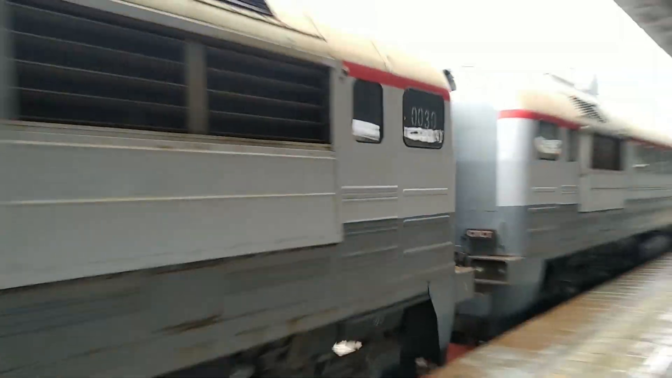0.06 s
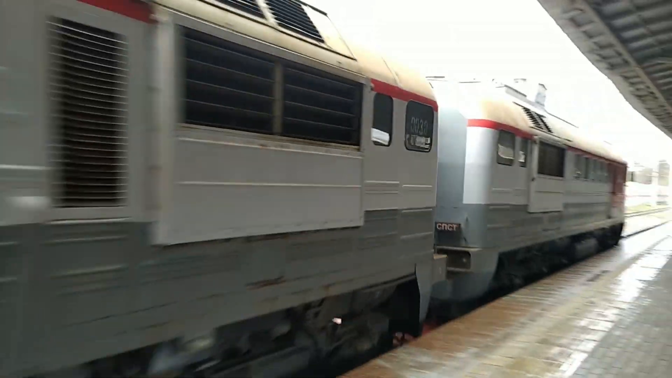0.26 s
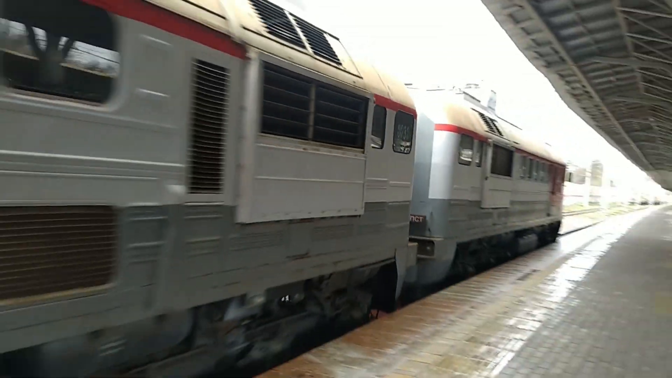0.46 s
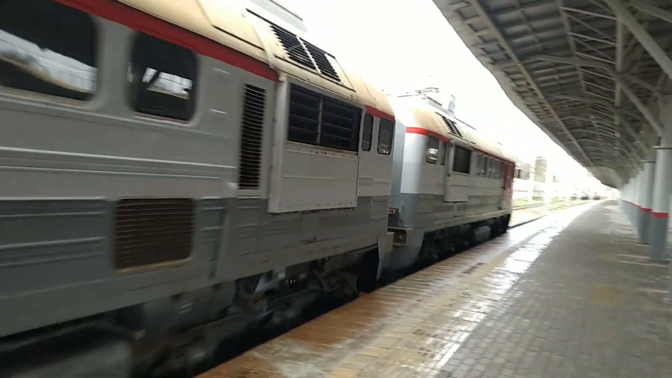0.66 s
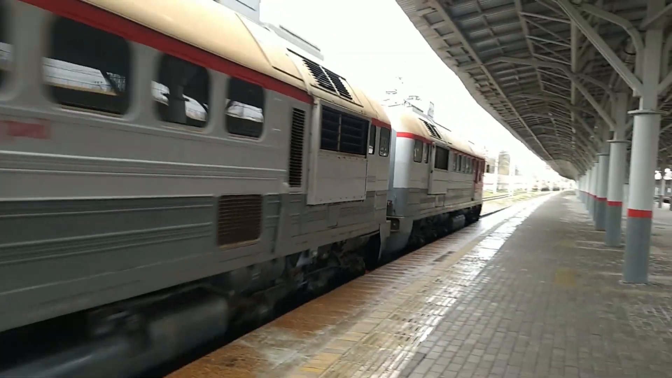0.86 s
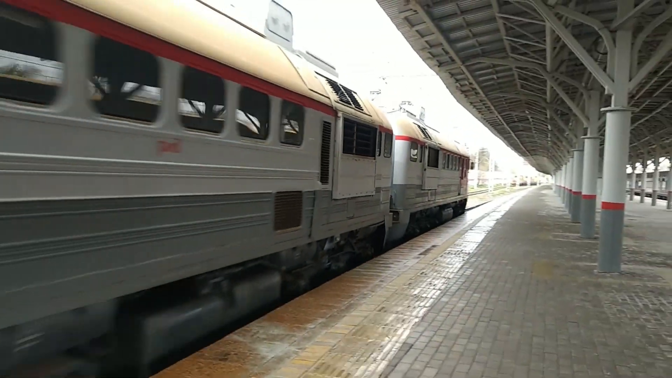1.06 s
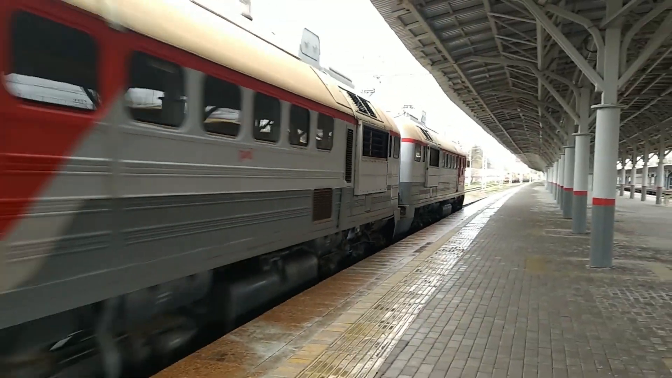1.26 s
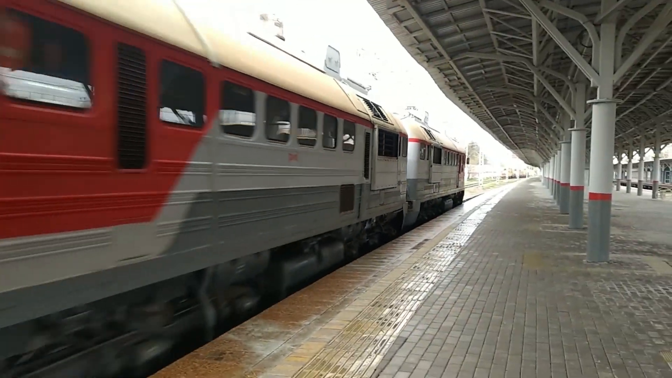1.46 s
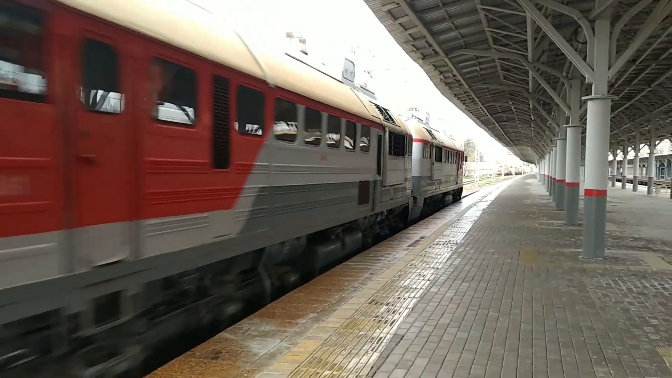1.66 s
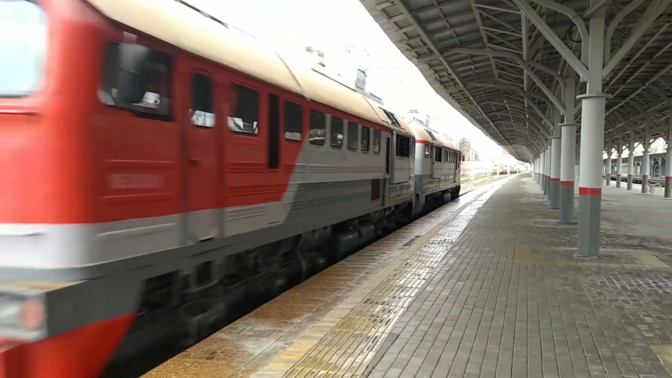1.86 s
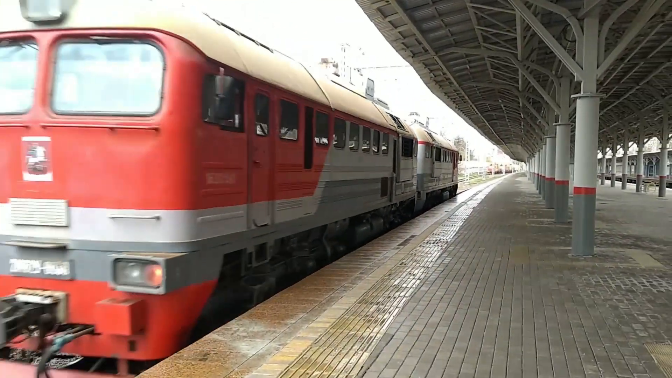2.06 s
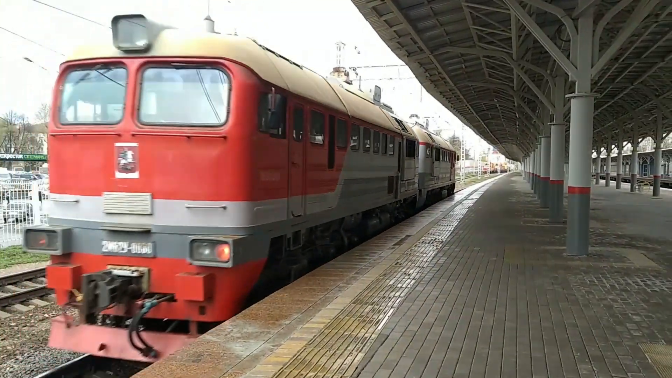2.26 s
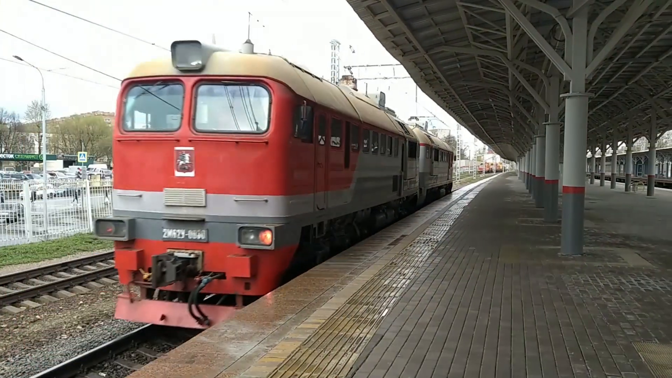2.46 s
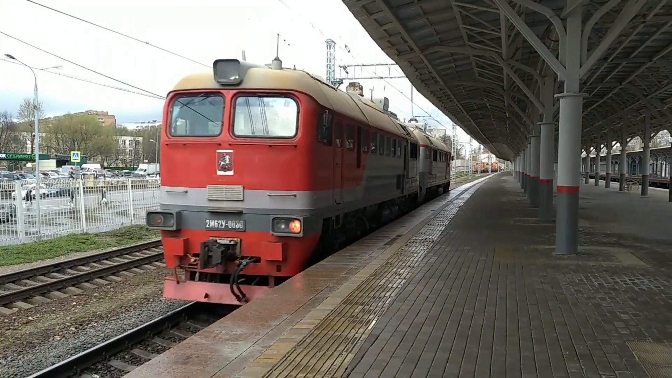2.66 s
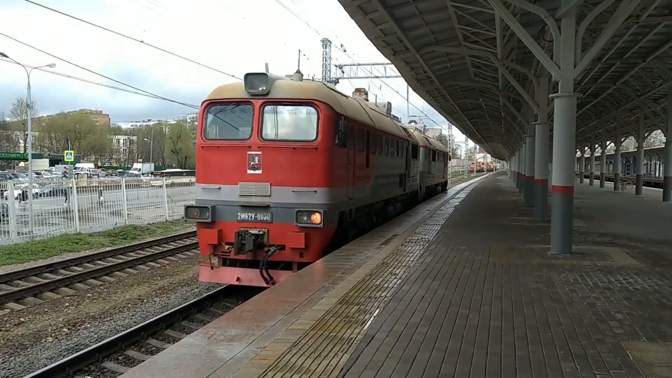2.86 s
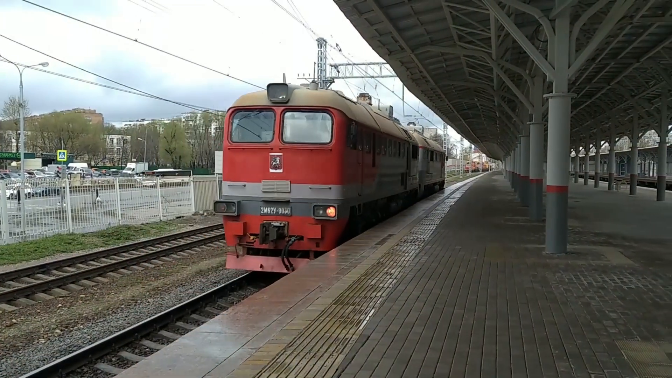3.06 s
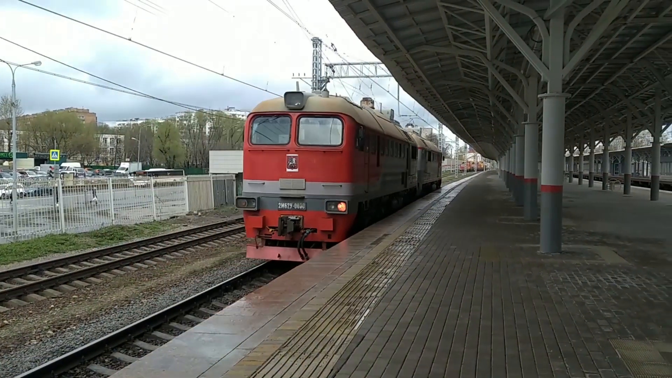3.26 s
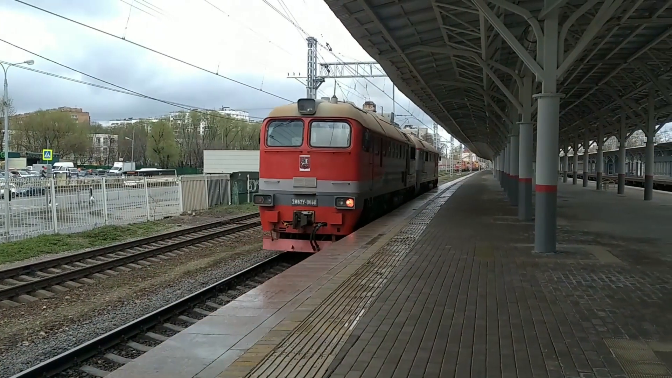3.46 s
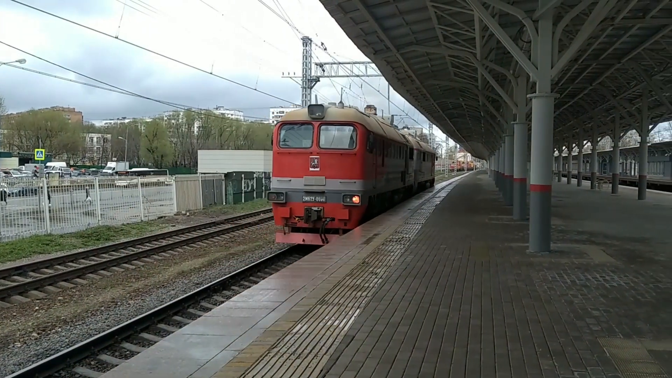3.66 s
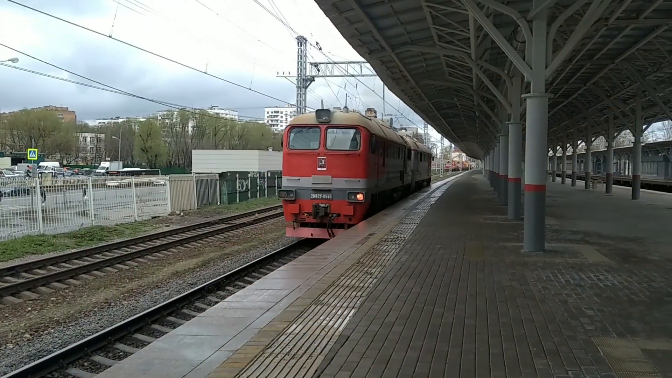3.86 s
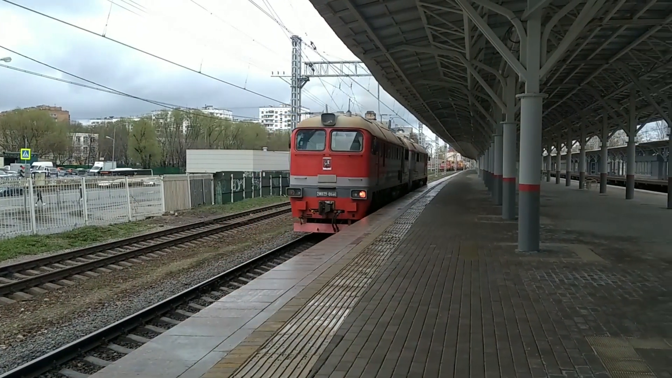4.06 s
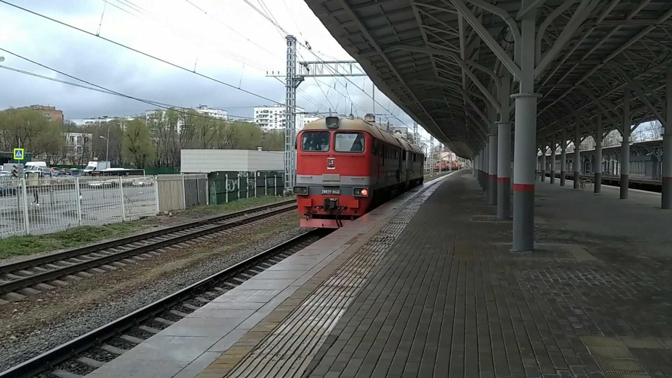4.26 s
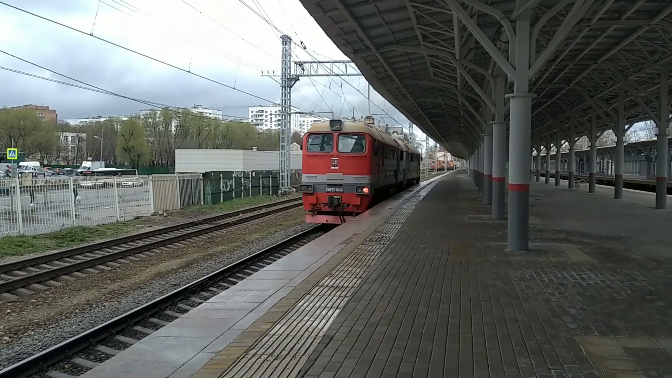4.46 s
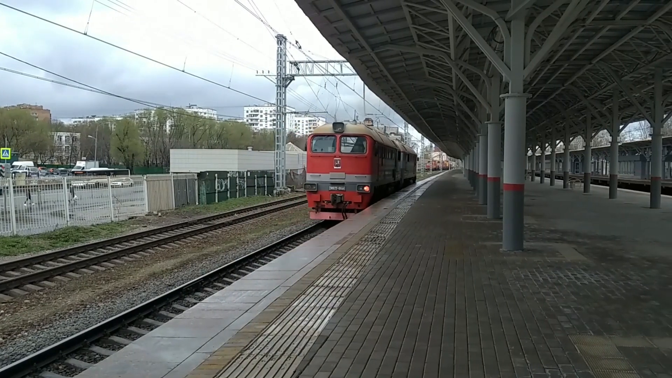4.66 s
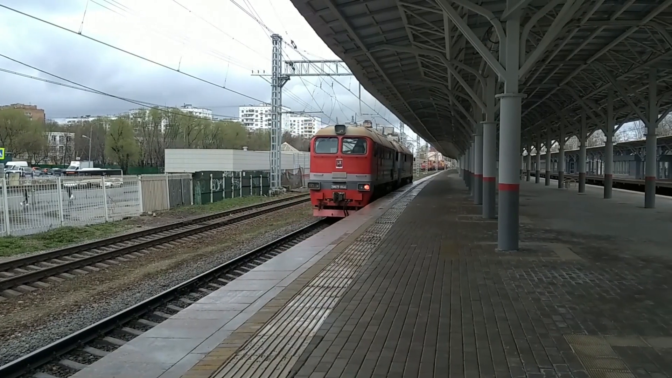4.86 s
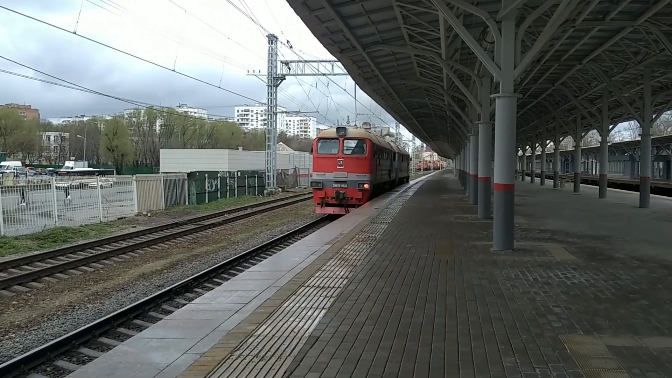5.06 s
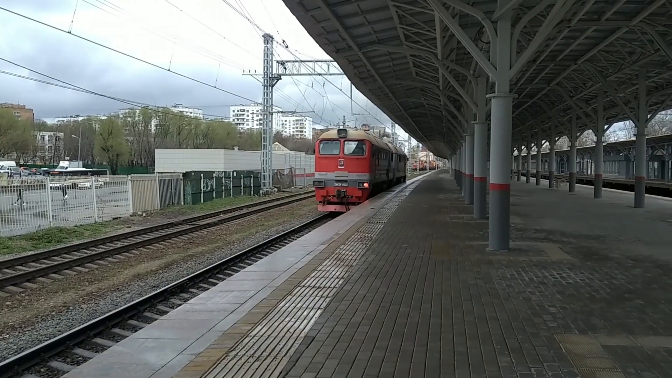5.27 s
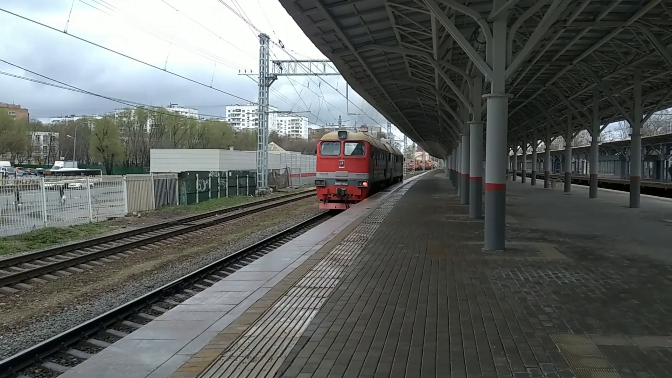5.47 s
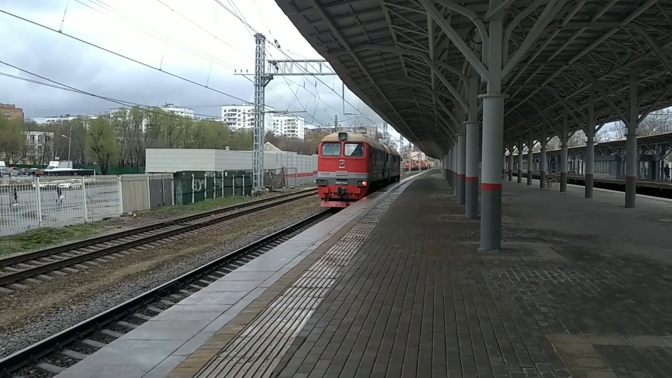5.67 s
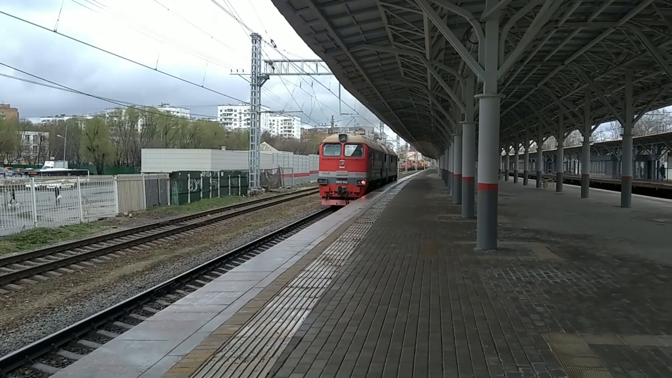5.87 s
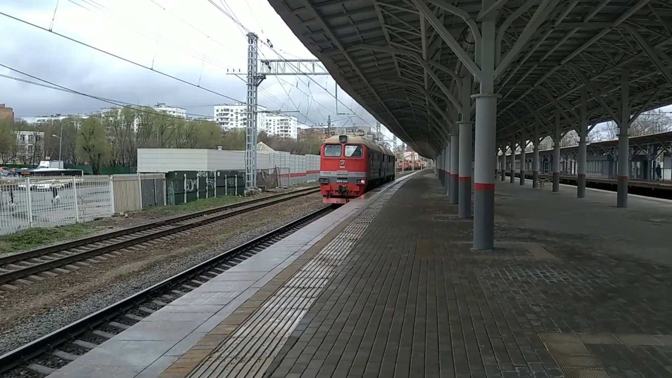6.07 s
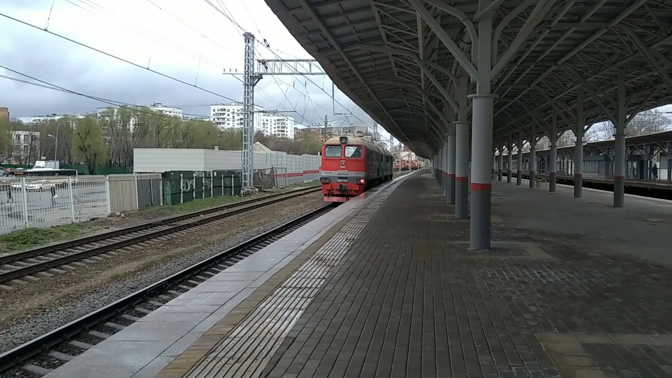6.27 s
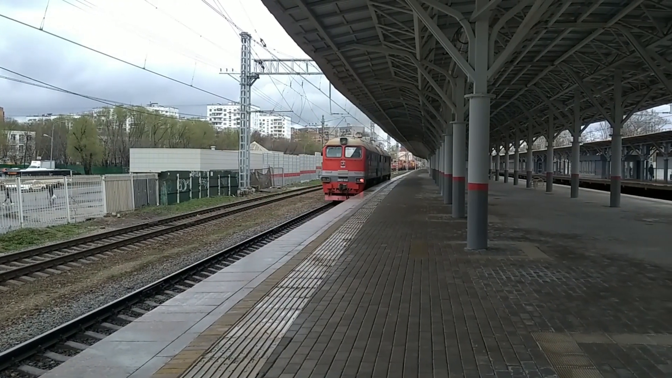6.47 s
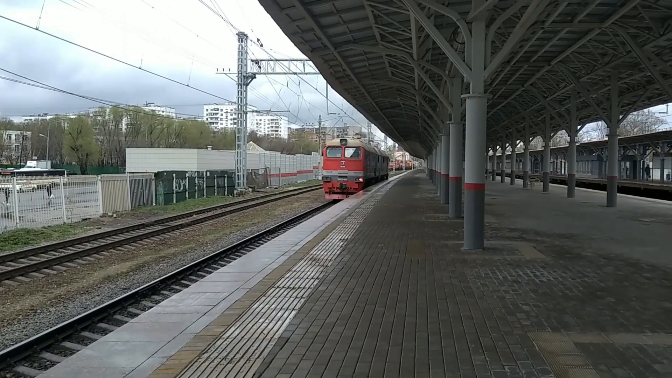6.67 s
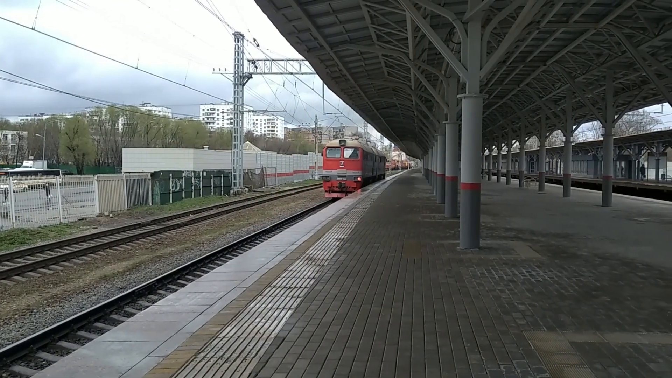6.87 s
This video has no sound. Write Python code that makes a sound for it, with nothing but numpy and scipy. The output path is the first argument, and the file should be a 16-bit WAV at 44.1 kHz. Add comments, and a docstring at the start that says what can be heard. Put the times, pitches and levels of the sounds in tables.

```python
"""Two-stroke engines of a two-unit diesel locomotive drone along a station platform and draw away.
Engine: tones locked to the crank over noise pulsed at the firing rate, plus a gear whine and a howl.
Wheels: shaped noise roars and grinds; machinery: bright noise chatters, hisses and rattles.
Two dull thumps, late, are decaying sines with noise; a low town rumble lies below.
The microphone ports are a little apart; the right one is far brighter."""
import sys
import numpy as np
from scipy import signal
from scipy.fft import rfft, irfft, next_fast_len
from scipy.io import wavfile
from scipy.ndimage import uniform_filter1d, map_coordinates

SR = 44100
rng = np.random.default_rng(int(sys.argv[2]) if len(sys.argv) > 2 else 0)


def inscribe(sig):
    """Save sig as 16-bit PCM at rate SR to the path in sys.argv[1].

    A 1-D sig is mono; a 2-D sig holds one channel per row.
    Samples are clipped to [-1, 1] before scaling.
    """
    pcm = np.round(np.clip(np.atleast_2d(sig).T, -1, 1) * 32767)
    wavfile.write(sys.argv[1], SR, pcm.astype(np.int16))


N = 305436


def amp(db):
    """Decibels to gain."""
    return 10 ** (np.asarray(db) / 20)


def unit(x):
    """Scaled to rms 1."""
    return x / np.sqrt(np.mean(x ** 2) + 1e-20)


def along(points, hz):
    """(frequency [Hz], value) points interpolated on a log frequency axis."""
    f, v = np.transpose(points)
    return np.interp(np.log(hz + 1), np.log(f + 1), v)


def curves(rows):
    """One value per sample for each column after the time [s]."""
    s, *cols = np.transpose(rows)
    return [np.interp(np.arange(N) / SR, s, c) for c in cols]


def wobble(knots_per_s):
    """Smooth random curve through normally distributed knots."""
    knots = rng.standard_normal(int(N * knots_per_s / SR) + 4)
    return map_coordinates(knots, [np.arange(N) * knots_per_s / SR])


def filtered(x, response):
    """x times a complex response of frequency."""
    size = next_fast_len(N + SR // 2)
    return irfft(rfft(x, size) * response(np.fft.rfftfreq(size, 1 / SR)), size)[..., :N]


def pan(left_right_db):
    """Left and right gains with a mean of 1."""
    gains = amp(np.array([[.5], [-.5]]) * left_right_db)
    return gains / gains.mean(0)


# phase by which the left port leads: (frequency [Hz], phase [rad])
LEFT_LEAD_RAD = [(90, 0.33), (170, 0.31), (260, 0.72), (400, 0.64), (660, -0.66), (1000, 0.55),
                 (1300, 0.32), (1600, 1.39), (1950, 1.5), (2400, 2), (3300, 4)]


def ports(x):
    """Sound from the track reaches the two ports out of step."""
    half_turns = np.array([[.5j], [-.5j]])
    return filtered(x, lambda hz: np.exp(half_turns * along(LEFT_LEAD_RAD, hz)))


# likeness of the two ports: (frequency [Hz], coherence [0-1])
PORT_COHERENCE = [(60, 1), (170, 0.76), (320, 0.99), (480, 0.84), (750, 0.97), (1050, 0.85), (1400, 0.76),
                  (1700, 0.99), (2000, 0.62), (2500, 0.75), (2900, 0.47), (3400, 1), (3900, 0.11)]


def rush(spectrum, patchy_db):
    """Shaped stereo noise of rms 1, with random gain patches in time and frequency."""
    z = signal.stft(rng.standard_normal((2, N)), nperseg=1024)[2]
    field = uniform_filter1d(rng.standard_normal(z.shape[1:]), size=5, axis=0)
    field = uniform_filter1d(field, size=7, axis=1)
    pair = signal.istft(z * amp(patchy_db * unit(field)), nperseg=1024)[1][:, :N]

    def mix(hz):
        turn = np.arccos(np.clip(along(PORT_COHERENCE, hz), 0, 1)) / 2
        return amp(along(spectrum, hz)) * [np.cos(turn), np.sin(turn)]

    mid, side = filtered(pair, mix)
    return unit(ports(np.array([mid + side, mid - side])))


def bursts(times_s, sizes, life_s):
    """Short swells at the given times; envelope around 0 with spread 1."""
    blows = np.bincount(np.abs(times_s * SR).astype(int), sizes, minlength=N)[:N]
    t = np.arange(SR // 10) / SR
    envelope = signal.fftconvolve(blows, t ** 2 * np.exp(-t / life_s))[:N]
    return unit(envelope - envelope.mean())


GRIT_PER_S, GRIT_LIFE_S, GRIT_DEPTH = 70, .0006, .3


def grit():
    """Gain of random ticks of uneven size in the running gear."""
    when, size = rng.random((round(GRIT_PER_S * N / SR), 2)).T
    return 1 + GRIT_DEPTH * bursts(when * N / SR, size ** 2, GRIT_LIFE_S)


SPEED_M_PER_S = 12.91
LENGTH_M = 20.9  # length over which the sound is spread
# shared swell, scaled by each source's swell share: (time [s], level [dB])
SWELL_DB = [(0.01, -0.7), (0.8, 0.9), (1.76, 1), (2.04, -1), (2.42, -1.5), (2.5, -0.7), (3.01, 2.5),
            (3.19, -1), (3.4, 1), (3.57, -1.5), (4.07, -2), (4.24, 1.1), (4.51, 0), (4.7, -1.5), (5.37, -3),
            (6.09, 1), (6.53, -0.4), (6.93, 0.5)]


def receding(leaves_s, shield_db_per_m, swells):
    """Level [dB] of a source drawing away: spreading, platform-edge shielding, shared swell."""
    gone_m = SPEED_M_PER_S * np.maximum(np.arange(N) / SR - leaves_s, 0)
    distance_m = np.hypot(LENGTH_M, gone_m)
    spreading_db = -20 * np.log10(distance_m / LENGTH_M)
    shielding_db = -shield_db_per_m * (distance_m - LENGTH_M)
    return spreading_db + shielding_db + swells * curves(SWELL_DB)[0]


# locomotive's side, scaled and offset by each source: (time [s], left-right balance [dB])
BEARING_DB = [(0.1, 2), (0.21, 4.5), (0.36, 3), (0.75, 4), (2.04, 0.5), (4.5, 0), (4.8, 2), (6.18, 3),
              (6.8, 3)]


def bearing():
    """Left-right balance [dB] of the locomotive, per sample."""
    return curves(BEARING_DB)[0]


# relative spectrum: (frequency [Hz], density [dB])
STATION_SPECTRUM = [(20, -40), (42, -23), (58, -8), (78, 1), (115, -5.5), (170, 0), (300, -9), (1000, -18),
                    (4000, -45), (9000, -70)]


def station():
    """Town around the platform: steady low rumble of shaped noise."""
    return amp(-57.0) * rush(STATION_SPECTRUM, patchy_db=1.5)


# knock components: (time [s], level before attack [dB], pitch [Hz], 60 dB decay [s])
THUMPS_HIT = [(5.176, -32.5, 790, .07), (5.178, -23.5, 347, .045), (5.185, -35, 110, 0.12),
              (6.786, -36, 120, .08)]


def thumps():
    """Dull knocks: decaying sines, each with a puff of noise around its pitch."""
    out = np.zeros(N + SR)
    t = np.arange(SR // 4) / SR
    for s, db, hz, t60_s in THUMPS_HIT:
        band = signal.butter(2, [hz / 2, hz * 2.0], "band", fs=SR, output="sos")
        puff = unit(signal.sosfilt(band, rng.standard_normal(len(t))))
        envelope = amp(db - 60 * t / t60_s) * (1 - np.exp(-t / 0.0018))
        knock = np.sin(2 * np.pi * hz * t) + 0.4 * puff
        out[round(s * SR):][:len(t)] += envelope * knock
    return ports(out[:N])


CHATTER_HZ, CHATTER_START_S, CHATTER_LEAD_S = 23.1, 0.0052, 0.0145
CHATTER_SCATTER_PERIODS, CHATTER_SPREAD_DB = .03, 1.5


def chatter(life_s):
    """Fast, regular train of double blows, alike in mean level."""
    count = 200
    beat, size, lead_size = rng.standard_normal((count, 3)).T
    at_s = CHATTER_START_S + (np.arange(count) + CHATTER_SCATTER_PERIODS * beat) / CHATTER_HZ
    times_s = np.r_[at_s, at_s - CHATTER_LEAD_S]
    return bursts(times_s, amp(CHATTER_SPREAD_DB * np.r_[size, lead_size]), life_s)


# metal rattles, levels before attack:
# (time [s], hiss level [dB], lower clatter level [dB], 60 dB decay [s])
RATTLES_HIT = [(1.735, -42, -37, .16), (2.298, -44, -35, .04), (2.34, -37, -55, .04),
               (2.474, -25.5, -46, .055), (2.636, -36, -55, .04), (3.002, -39, -35, .06),
               (3.327, -37, -52, .06), (3.382, -35.5, -55, .07), (3.425, -37, -55, .045),
               (3.64, -32.5, -50, .07), (3.848, -36, -53, .07), (4.257, -38, -55, .05),
               (4.364, -39, -55, .05), (5.484, -45, -62, .057), (6.753, -48, -64, .091)]


def rattles():
    """Decaying envelopes of the louder rattles: in the hiss, and in the lower clatter."""
    out = np.zeros((2, N))
    for s, hiss_db, clatter_db, t60_s in RATTLES_HIT:
        age = np.maximum(np.arange(N) / SR - s, 0)
        decay = amp(-60 * age / t60_s) * (1 - np.exp(-age / 0.0012))
        out += amp([[hiss_db], [clatter_db]]) * decay
    return out


HISS_DB, HISS_LEAVES_S = -32.5, 2.32
HISS_SHIELD_DB_PER_M = 0.2775  # treble is lost sooner
CLATTER_BESIDE_HISS_DB = -13.5
# relative depth of chatter and of its slow wobble: (time [s], depth [0-1])
CHATTER_DEPTH = [(0.6, 0), (1.1, 0.53), (2, 0.18), (2.45, 0.73), (3.6, 0.68), (4.5, 0.68), (5.6, 0.18)]
# hiss's own swell: (time [s], level [dB])
HISS_SWELL_DB = [(0, -1), (1.6, 1.86), (2.15, -1.3), (2.5, 1), (2.85, -0.5), (3.0, 2.5), (3.17, -3.5),
                 (3.38, 0.5), (3.53, -1.5), (3.67, -0.5), (3.77, -3), (3.88, 0.5), (3.97, -1.5), (4.25, 2),
                 (4.52, 3), (4.8, -0.8), (5.3, -3), (5.85, -0.5), (6.93, 1)]
# relative spectra of clatter and hiss: (frequency [Hz], density [dB])
CLATTER_SPECTRUM = [(1300, -34), (1900, 0.5), (2300, -8.5), (3000, -1), (3300, -3), (3600, -53),
                    (6000, -80)]
HISS_SPECTRUM = [(3400, -36), (3700, -21.5), (4000, -1), (4300, 1), (5000, -3.5), (6200, -8), (7400, -13),
                 (7950, -15), (8250, -33.5), (9800, -33.5), (12000, -50.5), (14500, -58)]
# duller far hiss: (frequency [Hz], gain [dB])
HISS_FAR_DB = [(4000, 0), (6000, -0.5), (8000, -4), (10000, -1)]


def machinery():
    """Chattering bright noise almost wholly at the right port, lower clatter, louder rattles."""
    depth, = curves(CHATTER_DEPTH)
    shake = 1 + 0.25 * depth * chatter(life_s=0.003)
    shake = shake * amp(0.57 * wobble(120) + 0.62 * depth * wobble(12))
    level_db = HISS_DB + receding(HISS_LEAVES_S, HISS_SHIELD_DB_PER_M, swells=0)
    level = amp(level_db + curves(HISS_SWELL_DB)[0]) * unit(shake)
    hiss_rattle, clatter_rattle = rattles()
    ragged = shake * grit() * amp(1.4 * wobble(110))
    clatter = unit(ragged * rush(CLATTER_SPECTRUM, patchy_db=3.0))
    hiss = unit(rush(HISS_SPECTRUM, patchy_db=1.55)[1])
    far, = curves([(3, 0), (5.5, 0.93)])
    dull = filtered(hiss, lambda hz: amp(along(HISS_FAR_DB, hz)))
    hiss = (1 - far) * hiss + far * dull
    bright = (level + hiss_rattle) * hiss * pan(-54)
    lower = (amp(CLATTER_BESIDE_HISS_DB) * level + clatter_rattle) * clatter * pan(-2.5)
    return bright + lower


ROLL_DB, ROLL_LEAVES_S = -22.5, 0.24
GRIND_DB, GRIND_LEAVES_S = -28, -0.15
WHEEL_SHIELD_DB_PER_M = 0.1552
# axles going by, then the canopy throwing the roar back: (time [s], width [s], level [dB])
ROLL_SURGES = [(1.04, 0.027, 0.5), (1.14, .04, 1), (1.23, 0.022, 1.5), (1.55, .025, 1.2), (2.61, .045, 3.5),
               (2.83, .06, 2.2)]
# relative spectra of near roll, far roll and grind: (frequency [Hz], density [dB])
ROLL_NEAR_SPECTRUM = [(130, -45), (210, -3), (270, 0), (400, 1), (480, -1.5), (600, 0.7), (700, -0.5),
                      (880, -0.5), (970, -5), (1100, -4.5), (1400, -12), (2200, -85)]
ROLL_FAR_SPECTRUM = [(130, -53), (210, -3), (280, -1), (365, .3), (440, -6), (540, -3.5), (650, -1.5),
                     (722, -1), (790, -1.5), (900, -1.5), (980, -7), (1100, -10), (1400, -21.5),
                     (2200, -71)]
GRIND_SPECTRUM = [(700, -48), (1050, -5), (1300, -1.5), (1600, 0), (1900, -4), (2200, -8), (2900, -10),
                  (3400, -28.5), (4500, -21), (6000, -34), (7900, -44), (8300, -73)]
# grind's side: (frequency [Hz], left-right balance [dB])
GRIND_PAN_DB = [(1000, -5), (1450, -4.5), (2000, -3.5), (2800, -3), (4000, -0.5)]


def wheels():
    """Rolling noise turns hollow with distance under the canopy; steel grinds above it."""
    t = np.arange(N) / SR
    roll_db = ROLL_DB + receding(ROLL_LEAVES_S, WHEEL_SHIELD_DB_PER_M, swells=0.96)
    roll_db += sum(db * np.exp(-((t - s) / width_s) ** 2) for s, width_s, db in ROLL_SURGES)
    grind_db = GRIND_DB + receding(GRIND_LEAVES_S, WHEEL_SHIELD_DB_PER_M, swells=0.69)
    far, = curves([(1.5, 0.0074), (4.8, 0.92)])
    near_roll = np.sqrt(1 - far) * rush(ROLL_NEAR_SPECTRUM, patchy_db=0.5)
    far_roll = np.sqrt(far) * rush(ROLL_FAR_SPECTRUM, patchy_db=1.0)
    grind = rush(GRIND_SPECTRUM, patchy_db=1.0)
    grind = filtered(grind, lambda hz: pan(along(GRIND_PAN_DB, hz)))
    judder = wobble(60)  # shared by roll and grind
    roll_gain = amp(roll_db + 0.56 * judder)
    grind_gain = amp(grind_db + 0.52 * judder + 0.46 * wobble(16)) * np.sqrt(grit())
    side_db = bearing()
    roll = roll_gain * (near_roll + far_roll) * pan(side_db - .3)
    return roll + grind_gain * grind * pan(side_db - .8)


DRIFT_RAD, ECHO_SHARE = 0.75, 0.45


def wavering(phase, smear_rad, flutter_db):
    """Tone of rms 1; shifting reflections and the second engine blur its phase and level."""
    blur = DRIFT_RAD * wobble(7) + smear_rad * (wobble(12) + 0.5 * wobble(32))
    echoes = ECHO_SHARE * (wobble(22) + 1j * wobble(22))
    wave = np.real((1 + echoes) * np.exp(1j * (phase + blur)))
    return unit(amp(flutter_db * wobble(14)) * wave)


# main note, twice the firing rate: (time [s], frequency [Hz])
NOTE_HZ = [(0, 173.8), (1.5, 172.1), (2.5, 172), (3.5, 173.8), (4.5, 175.4), (5.5, 178.7), (6.93, 180.9)]


def crank():
    """Crankshaft angle [rad]: twelve firings a turn, two cycles of the note a firing."""
    return 2 * np.pi * np.cumsum(curves(NOTE_HZ)[0]) / SR / 24


def tone(order, smear_rad, flutter_db):
    """Wavering tone at a multiple of the crankshaft speed."""
    return wavering(order * crank(), smear_rad, flutter_db)


# howl: (time [s], frequency [Hz], level [dB])
HOWL_TRACK = [(.25, 692, -45), (.8, 688, -45), (1.08, 691, -33), (1.35, 689.3, -40), (1.75, 692, -40),
              (2.1, 700.6, -46.5), (2.9, 704, -40.5), (3.7, 708, -49), (4.3, 710, -48), (4.7, 710, -46),
              (5.0, 719.7, -53), (5.5, 722, -49), (5.8, 722, -59), (6.05, 720, -52), (6.3, 724, -64),
              (6.93, 727.3, -68)]


def howl():
    """Narrow, unsteady tone that creeps up in pitch overall."""
    hz, db = curves(HOWL_TRACK)
    return amp(db) * wavering(2 * np.pi * np.cumsum(hz) / SR, smear_rad=1.1, flutter_db=1.5)


BEAT_PEAK_S, BEAT_HZ, BEAT_DEPTH = 1.252, 3.2, 0.57
# whine before beating: (time [s], level [dB])
WHINE_DB = [(0, -47), (.7, -39), (.93, -35), (1.3, -34.5), (1.58, -37), (1.8, -50), (2.8, -47), (3.3, -60),
            (4.6, -57), (5.2, -62), (6.93, -70)]


def whine():
    """Gear whine, strongest beside the engine room; the two engines beat against each other."""
    t = np.arange(N) / SR - BEAT_PEAK_S
    beat = 1 + BEAT_DEPTH * np.cos(2 * np.pi * BEAT_HZ * t)
    return amp(curves(WHINE_DB)[0]) * beat * tone(order=145.4, smear_rad=0.9, flutter_db=0.5)


EXHAUST_DB, EXHAUST_LEAVES_S, EXHAUST_SHIELD_DB_PER_M = -30, 0.6, 0.23
EXHAUST_PAN_DB, EXHAUST_SWING = -8.5, 1.53  # lies to the right, swings further than the bearing
# relative spectrum: (frequency [Hz], density [dB])
RUMBLE_SPECTRUM = [(20, -45), (38, -31), (50, -26), (62, -19), (80, -4.5), (105, -4), (135, 1.5), (200, 1),
                   (240, 0), (320, -5), (600, -74)]
# weaker tones, relative to each other: (multiple of crankshaft speed [1], level [dB])
CRANK_ORDERS = [(7, -25), (11, -9.5), (12, -2.5), (13, -7.5), (16, -2.5), (22, -3.5), (23, -21), (25, -13)]
# main note and its octave before trim, third harmonic: (time [s], level [dB])
NOTE_LEVEL_DB = [(0.0, -32), (0.17, -29.5), (0.44, -35.5), (0.67, -24.5), (1.02, -44), (1.12, -27.5),
                 (1.35, -42), (1.43, -26), (1.81, -43), (1.89, -35.5), (2.6, -35.5), (2.9, -44.5),
                 (3.01, -37.5), (3.15, -50), (3.3, -37), (3.48, -34.5), (3.59, -50), (3.91, -42.5),
                 (4.03, -50), (4.32, -44), (4.85, -56), (4.98, -43.5), (5.2, -61), (5.94, -54),
                 (6.93, -59.5)]
OCTAVE_LEVEL_DB = [(0.1, -32), (1.03, -36.5), (1.11, -22.5), (1.38, -29), (1.55, -39), (1.66, -26),
                   (1.8, -27), (1.9, -39), (2.08, -43), (2.19, -30), (2.26, -43.5), (3.1, -40), (3.23, -52),
                   (3.35, -38), (3.72, -61), (4.35, -48), (4.8, -58), (5.3, -51), (5.65, -58), (6.03, -50),
                   (6.3, -57), (6.8, -50)]
THIRD_LEVEL_DB = [(.25, -42), (.75, -34), (1.08, -33), (1.35, -42), (1.6, -39), (1.75, -31), (2.1, -41),
                  (2.9, -39), (3.2, -46), (3.9, -46), (4.7, -50.5), (5.1, -57), (5.35, -58), (5.65, -51),
                  (6.1, -57), (6.93, -64)]


def engine():
    """Exhaust noise puffs at the firing rate, with crank orders, drone, howl and whine."""
    exhaust_db = EXHAUST_DB + receding(EXHAUST_LEAVES_S, EXHAUST_SHIELD_DB_PER_M, swells=0.69)
    side_db = EXHAUST_PAN_DB + EXHAUST_SWING * bearing()
    puffs = 1.0 + 0.18 * tone(order=12, smear_rad=0.27, flutter_db=5)
    rumble = amp(exhaust_db) * unit(puffs * rush(RUMBLE_SPECTRUM, patchy_db=1.6))
    orders = sum(amp(db) * tone(k, smear_rad=0.9, flutter_db=2.0) for k, db in CRANK_ORDERS)
    orders = amp(exhaust_db - 9.0) * orders
    note_gain = amp(curves(NOTE_LEVEL_DB)[0] - 1.0)
    note = note_gain * tone(order=24, smear_rad=0.47, flutter_db=1.0)
    octave_gain = amp(curves(OCTAVE_LEVEL_DB)[0] - 1.4)
    octave = octave_gain * tone(order=48, smear_rad=0.79, flutter_db=1.5)
    third = amp(curves(THIRD_LEVEL_DB)[0]) * tone(order=72, smear_rad=1.15, flutter_db=1.5)
    low = (rumble + ports(orders + note)) * pan(side_db)
    return low + ports((octave + third + howl()) * pan(.5) + whine() * pan(-2.5))


def scene():
    """Everything heard from the platform."""
    return station() + thumps() + machinery() + wheels() + engine()


BAND_LIMIT_HZ, BASS_HZ = 14200, 35
NOTCH_HZ, NOTCH_WIDTH_HZ, NOTCH_DB = 3450, 169, -6


def record(dry):
    """Recorder: thins the deepest bass, notches the treble, keeps nothing above its band limit."""
    def response(hz):
        notch = amp(NOTCH_DB * np.exp(-((hz - NOTCH_HZ) / NOTCH_WIDTH_HZ) ** 2))
        bass_cut = hz ** 2 / np.sqrt(hz ** 4 + BASS_HZ ** 4)
        return (hz < BAND_LIMIT_HZ) * notch * bass_cut

    return filtered(dry, response)


dry = scene()
out = record(dry)
inscribe(out)
```